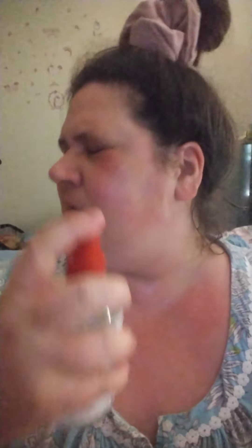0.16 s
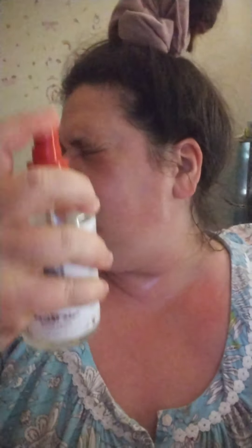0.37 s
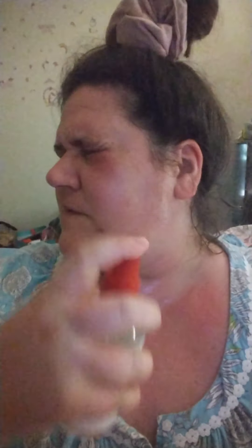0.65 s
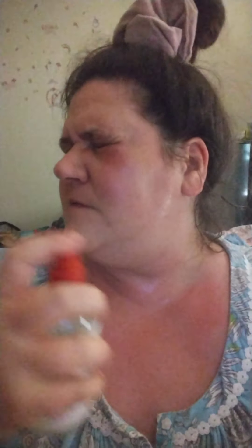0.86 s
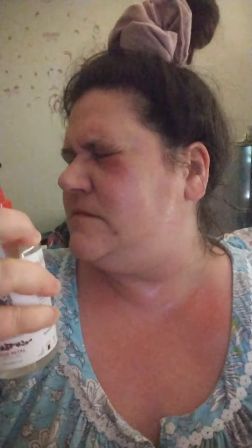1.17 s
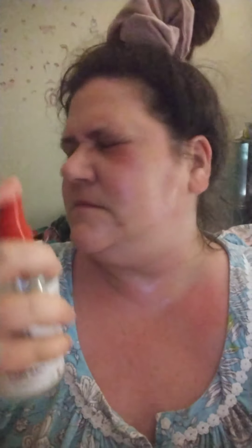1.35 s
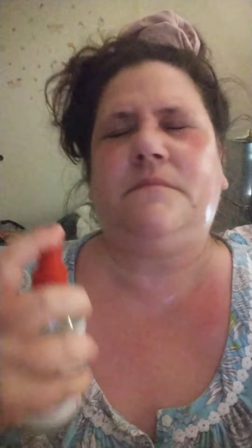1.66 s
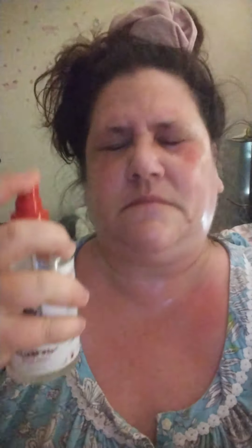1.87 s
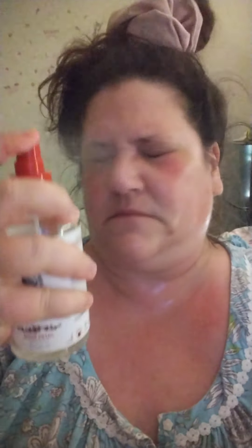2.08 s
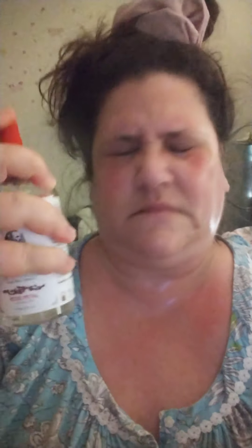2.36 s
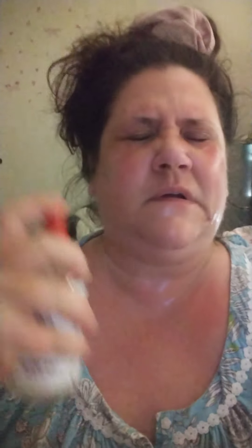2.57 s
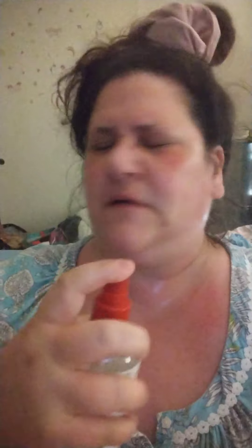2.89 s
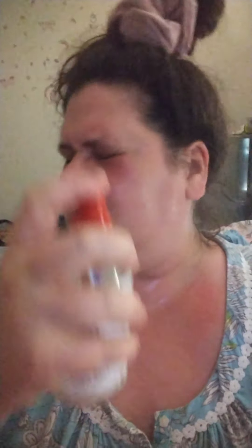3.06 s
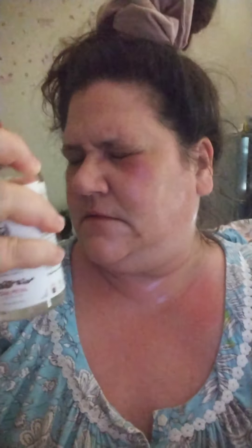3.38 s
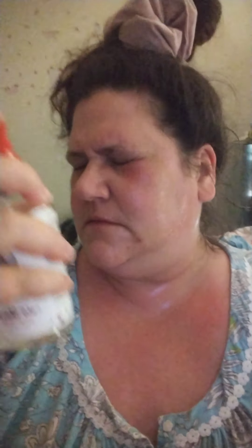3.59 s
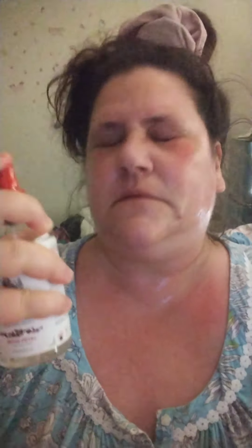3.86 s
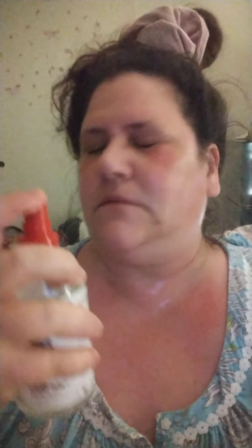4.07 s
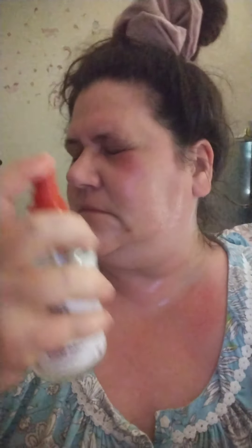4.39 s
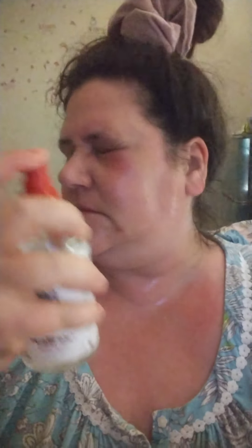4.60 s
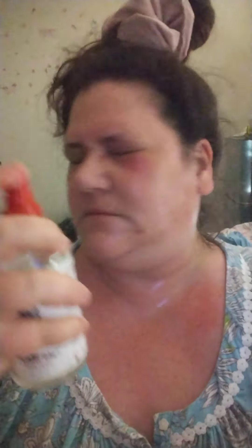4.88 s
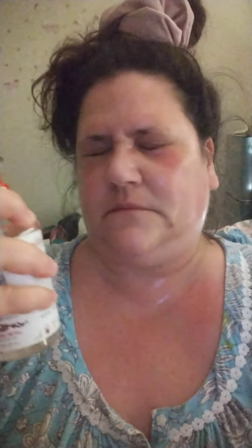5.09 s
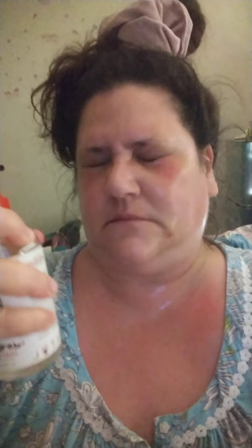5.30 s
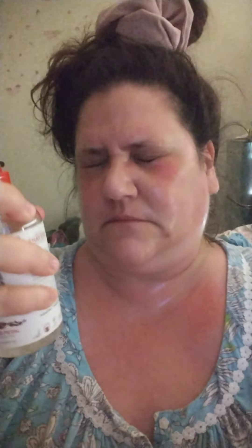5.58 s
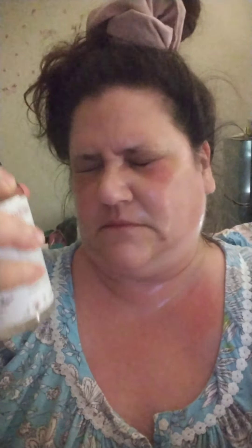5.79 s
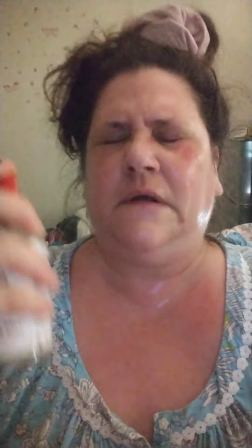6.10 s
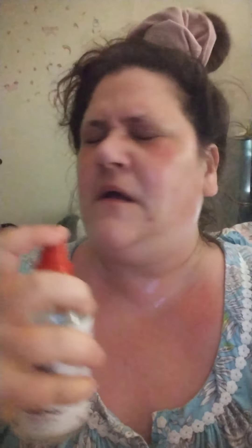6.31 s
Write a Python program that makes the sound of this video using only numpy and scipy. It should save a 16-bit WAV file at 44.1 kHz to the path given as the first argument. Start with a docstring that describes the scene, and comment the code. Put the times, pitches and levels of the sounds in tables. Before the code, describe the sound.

A small finger-pump spray bottle is pumped over and over, about three times a second, close to the microphone in a quiet furnished room. Each stroke starts with a light plastic click, gives a short bright hiss of mist and ends with a small knock as the plunger stops. Faint spring ticks and tiny liquid sounds follow. The pace stays steady while the sprays soften slightly.

```python
"""Finger-pump spray bottle, close up

A furnished room, a phone at arm's length, the bottle left of centre and pumped about three times a second.
Each stroke: the cap knocks and snaps free, the nozzle hisses until the plunger hits bottom, the cap
clacks back, the spring ticks as it lifts the plunger and liquid bubbles up the dip tube.
A low room tone and a faint hiss lie behind. The right microphone is shaded and misses the top treble."""
import sys
import numpy as np
from scipy import signal
from scipy.fft import rfft, irfft, next_fast_len
from scipy.io import wavfile

SR = 44100
rng = np.random.default_rng(int(sys.argv[2]) if len(sys.argv) > 2 else 0)


def file_out(sig):
    """Save sig as 16-bit WAV at sys.argv[1]."""
    # one column per channel
    cols = np.atleast_2d(sig).T
    # limit, then scale
    lim = np.clip(cols, -1, 1)
    pcm = np.round(lim * 32767).astype(np.int16)
    wavfile.write(sys.argv[1], SR, pcm)


N = 284445
TIME = np.arange(N) / SR
USUAL_PRESS_DB, USUAL_SPRAY_DB, USUAL_KNOCK_DB = -34, -35, -37  # an ordinary stroke
CAP_HZ = 5450  # a press retunes all modes by the stroke's cap tuning over this
RETURN_LAG_S_PER_S = 0.0016  # the finger lets the plunger up more slowly as the pumping goes on

# The pump strokes at arm's length, the first already under way at 0 s; levels are relative. Columns:
# cap free t/s, plunger stop t/s, press level/dB, cap tuning f/Hz, spray, stop knock, stop snap level/dB
STROKES = [(-0.1, 0.0193, -31, 5450, -32.5, -30.5, -23.5), (0.1794, 0.29, -29.5, 5580, -34, -33.5, -26.5),
           (0.4686, 0.5913, -29.5, 5500, -33, -31, -25), (0.7775, 0.8966, -33.5, 5670, -32, -31, -28),
           (1.0943, 1.2132, -30.5, 5370, -34.5, -35.5, -28), (1.391, 1.5094, -30, 5540, -33.5, -35.5, -43),
           (1.694, 1.8096, -30.5, 5320, -34, -33.5, -28), (1.9866, 2.103, -28, 5460, -33, -35.5, -29),
           (2.2866, 2.4148, -32, 5160, -35.5, -44, -56), (2.583, 2.7122, -32, 5340, -33.5, -41.5, -50),
           (2.879, 3.0027, -33.5, 4820, -34, -40.5, -30), (3.1836, 3.292, -35.5, 5170, -36, -36.5, -23.5),
           (3.4814, 3.5921, -36.5, 5350, -36, -34, -21.5), (3.775, 3.8926, -37, 5570, -37.5, -38, -25),
           (4.0827, 4.1913, -39, 5300, -35.5, -39, -25.5), (4.3912, 4.4972, -37.5, 5420, -35.5, -38, -22),
           (4.678, 4.786, -35.5, 5300, -35, -39.5, -24.5), (4.988, 5.0983, -37, 5370, -37.5, -41.5, -27),
           (5.2926, 5.396, -36, 5300, -35, -35.5, -26.5), (5.583, 5.6825, -38.5, 5390, -35.5, -34.5, -25.5),
           (5.854, 5.978, -39.5, 5540, -37.5, -48.5, -54), (6.1628, 6.269, -35.5, 5180, -37.5, -43, -36)]


def press_clicks(slack_s=.008, cap_boost_db=4):
    """The finger takes up the slack with a soft knock, then the cap snaps free; harder is brighter."""
    out = np.zeros((2, N))
    hz, _, drive, *_ = np.transpose(MODES)
    drive[np.argmin(abs(hz - CAP_HZ))] += cap_boost_db  # the snap favours the cap's own mode
    for s, _, press_db, cap_hz, *_ in STROKES[1:]:
        body_db = -39 + 0.69 * (press_db - USUAL_PRESS_DB)
        add(out, s - slack_s, plastic_click(padded(drive, 0.87), [body_db - 8.5], crack_db=-9.5))
        add(out, s, plastic_click(padded(drive, .15), [body_db, press_db, press_db - 3.5],
                                  crack_db=-3.5, tuning=cap_hz / CAP_HZ, detune=.01))
    return out


# Spectra of the jet at the nozzle and of its mist of droplets: f/Hz, relative level/dB
JET = [(150, -69), (330, -73.5), (520, -9), (1000, -5.5), (1600, 0), (2500, 1), (3500, 3.5), (4600, 1),
       (6000, 2), (8000, 4.5), (9500, -40), (12000, -46.5)]
MIST = [(6000, -44), (8500, -3.5), (10300, 2), (12000, 5.5), (13200, -2.5), (14500, 1.5), (16000, -20)]


def nozzle(open_s=0.034, rise_s=0.0008, close_lead_s=0.012, sag_db=1.5, leak_db=-19, jet_db=-8):
    """Pressure swells and sags through each stroke; the jet hisses and breaks into fine droplets."""
    spray = np.zeros((2, N))
    fall_s = np.array([[0.027], [0.026]])  # jet, mist
    for pressed, stop, _, _, spray_db, *_ in STROKES:
        start = pressed + open_s * undb(spray_db - USUAL_SPRAY_DB) ** -.37  # harder opens sooner
        opened = 1 - np.exp(-np.maximum(TIME - start, 0) / rise_s)
        closing = np.exp(-np.maximum(TIME - stop + close_lead_s, 0) / fall_s)
        travel = np.clip((TIME - start) / (stop - start), 0, 1)
        pressure = undb(sag_db * (1 / 3 - (2 * travel - 1) ** 2))
        seep = undb(leak_db) * (TIME > pressed) * (1 - opened)  # the valve seeps before it opens
        spray += undb(spray_db) * (opened * closing * pressure + seep)
    breakup = undb(.45 * wander(160) + 1.3 * wander(2500))
    jet = unit(colour(stereo_noise(N, 1300), JET))
    mist = unit(colour(stereo_noise(N, 720), MIST))
    return breakup * (spray[0] * undb(jet_db) * jet + spray[1] * mist)


def stop_knocks(thud_s=0.004115):
    """The plunger hits its stop: the bottle knocks, the contact snaps, and both ring the cap."""
    out = np.zeros((2, N))
    drive = np.array(MODES)[:, 3]
    for _, stop, *_, knock_db, snap_db in STROKES:
        ring_db = knock_db + 0.4 * (snap_db - knock_db)
        band_db = [knock_db - 1.1, ring_db - 6, snap_db - 2.5]
        add(out, stop, plastic_click(drive, band_db, crack_db=8, crack_s=0.00091))
        # the bottle jolts in the hand
        add(out, stop + thud_s, plastic_click(padded(drive), [knock_db - 6], crack_db=-35.5))
    return out


def rebounds(delay_s=.0113, bounce_s=.01, bounce_db=-14):
    """The cap clacks back and bounces once; a harder stop throws it further, so it is later and louder."""
    out = np.zeros((2, N))
    drive = padded(np.array(MODES)[:, 4], 0.26)
    for _, stop, *_, knock_db, _ in STROKES:
        force_db = knock_db - USUAL_KNOCK_DB
        s = stop + delay_s * undb(force_db) ** .37
        band_db = np.array([-39, -33.5, -37.5]) + force_db * np.array([0.81, 0.6, 0.92])
        add(out, s, plastic_click(drive, band_db, crack_db=2.5))
        add(out, s + bounce_s, plastic_click(drive, band_db + bounce_db))
    return out


# The two places where the rising spring catches, before lag and fade:
# t/s after the stop, bottle body level/dB, cap ring level/dB, coil f/Hz
SPRING_CATCHES = [(.067, -53, -53, 2090), (.106, -56.5, -49, 2820)]


def spring(body_fade_db_per_s=0.54, coil_boost_db=15):
    """A soft double tick at each catch rings the modes near the coil's pitch; later returns are gentler."""
    out = np.zeros((2, N))
    hz, *_, drive = np.transpose(MODES)
    for _, stop, *_ in STROKES:
        fade_db = body_fade_db_per_s * stop * np.array([1, 7, 7])  # gentler is also duller
        for delay_s, body_db, ring_db, coil_hz in SPRING_CATCHES:
            s = stop + delay_s + RETURN_LAG_S_PER_S * stop
            focused = drive + coil_boost_db * np.exp(-(np.log(hz / coil_hz) / 0.2) ** 2)
            band_db = np.array([body_db, ring_db, ring_db - 12]) - fade_db - 0.6 * rng.standard_normal()
            add(out, s - .001, plastic_click(focused, band_db - 1, crack_db=-16, crack_s=0.0024))
            add(out, s + rng.uniform(0.00083, 0.0034), plastic_click(focused, band_db + 3, crack_db=-23))
    return out


def refill(delay_s=.114, span_s=.03, bubbles=5, tube_hz=3130, glide=.04, t60_s=.02, size=1024):
    """Liquid is sucked up the dip tube after each stroke: small bubbles chirp and the ball valve ticks."""
    out = np.zeros((2, N))
    t = np.arange(size) / SR
    for _, stop, *_ in STROKES:
        s = stop + delay_s + RETURN_LAG_S_PER_S * stop
        valve_gain = undb(-46 - 2.2 * stop)  # the ticks fade as the returns grow gentler
        for when, pitch, strength in rng.uniform(0, 1, (bubbles, 3)):
            hz = tube_hz * (.95 + .1 * pitch) * (1 + glide * t / t[-1])
            bubble = np.sin(2 * np.pi * np.cumsum(hz) / SR) * undb(-49.5 - 60 * t / t60_s)
            tick = stereo_noise(size, 2000) * np.exp(-t / .0005)
            add(out, s + when * span_s, strength * (bubble + valve_gain * tick))
    return out


# Modes of bottle and cap: f/Hz, uncapped t60/s, drive level/dB for press, stop, rebound, spring return
MODES = [(437.5, 0.026, -13.5, -17, -10.5, -9.5), (811, 0.011, -5.5, 3, -3.5, -9),
         (1060, 0.012, -15.5, 1.5, -29, 5), (1406, 0.032, -21.5, -6.5, -13, 0.5),
         (1776, 0.017, -12.5, 2.5, 1, -27), (2090, 0.007, -45, 18, -2.5, 5.5),
         (2446, 0.023, 4.5, 10, 2.5, -2.5), (2635, 0.018, 2, -4, 10, -1), (3044, 0.028, -4, 4, -12.5, -5.5),
         (4150, 0.0066, 4.5, 8, 2.5, 1), (4980, 0.0051, -9.5, -17, 7.5, -15),
         (5360, 0.0078, 7.5, -12.5, 1, -14), (5727, 0.01, 11.5, 13, 11.5, 1.5),
         (6800, 0.012, 6, -27.5, 0, -13.5), (9890, 0.013, 0.5, 21, 11, 16.5),
         (10280, 0.0087, 8, 1, 11.5, 14.5), (12420, 0.011, 13.5, 15, 28.5, 7.5)]
# A click's body, ring and snap bands: lower f/Hz, upper f/Hz
CLICK_BANDS = [(340, 3400), (3400, 8500), (8500, 14500)]


def plastic_click(drive, band_db, crack_db=0, crack_s=0.0017, tuning=1, detune=0.043, size=2048):
    """A crack of contact and the damped modes it rings; band_db is each band's energy as 10 ms rms."""
    t = np.arange(size) / SR
    hz, t60 = np.transpose(MODES)[:2, :, None]
    t60 = np.minimum(t60, 36 / hz)  # 36 cycles at most: soft plastic stops the high modes soonest
    pitch, strength, phase, spread = rng.standard_normal((4, len(hz), 1))
    # short waves reach the two microphones with unrelated phases
    phase = 1.28 * phase + np.array([1, -1])[:, None, None] * spread * np.minimum((hz / 4000) ** 2, 1)
    envelopes = undb(drive[:, None] + 2.5 * strength - 60 * t / t60)
    ring_hz = hz * tuning * (1 + detune * pitch)
    click = np.sum(envelopes * np.sin(2 * np.pi * ring_hz * t + phase), axis=1)
    click += undb(crack_db + 2.5) * stereo_noise(size, 1400) * np.exp(-t / crack_s)
    click *= 1 - np.exp(-t / .0003)  # the contact yields for an instant
    out = 0
    for edges, db in zip(CLICK_BANDS, band_db):
        band = signal.sosfilt(signal.butter(3, edges, "bandpass", fs=SR, output="sos"), click)
        out = out + undb(db) * unit(band) * np.sqrt(.01 * SR / size)
    return out


def padded(drive, softness=1):
    """A padded push hardly drives the high modes."""
    return drive - softness * 20 * np.log10(1 + (np.array(MODES)[:, 0] / 1000) ** 2)


# Colour of the reflections from the furnished room: f/Hz, relative level/dB
WALLS = [(150, 13), (500, 3), (1300, 3), (2400, 0.5), (3600, 1), (5300, -3.5), (6800, 3.5), (10000, -4),
         (16000, -9.5)]


def room(direct, t60_s=0.24, first_s=0.00061, build_s=0.00053, send_db=-7, size=24000):
    """Dense reflections from close walls and bedding build up at once and die quickly."""
    t = np.arange(size) / SR
    low = signal.sosfilt(signal.butter(2, 3500, fs=SR, output="sos"), stereo_noise(size, 932))
    high = signal.sosfilt(signal.butter(2, 3500, "highpass", fs=SR, output="sos"), stereo_noise(size, 740))
    tail = (low + high) * undb(-60 * t / t60_s)
    tail *= 1 - np.exp(-np.maximum(t - first_s, 0) / build_s)
    tail = colour(unit(tail) / np.sqrt(size), WALLS)
    return undb(send_db) * signal.fftconvolve(direct, tail, axes=1)[:, :N]


# Room tone at the phone: f/Hz, relative level/dB
ROOM_TONE = [(25, -1.5), (50, -1), (105, 4.5), (160, -1.5), (300, -3.5), (700, -17), (2000, -19),
             (6000, -59), (16000, -42)]
# A faint hiss that hangs between the early strokes: t/s, level/dB
FAINT_HISS = [(0, -54.5), (1.3, -53.5), (2.85, -57), (3.1, -73.5), (6.45, -70.5)]


def background(tone_db=-68, swell_db=2):
    """A low, wavering room tone and a faint, flickering hiss that drops away near 3 s."""
    tone = undb(tone_db + swell_db * wander(14)) * unit(colour(stereo_noise(N, 900), ROOM_TONE))
    hiss_spectrum = [(300, -12.5), (2500, -4.5), (7000, -13.5), (11000, -6), (16000, -23.5)]
    hiss = unit(colour(stereo_noise(N, 580), hiss_spectrum))
    hiss_db = np.interp(TIME, *np.transpose(FAINT_HISS)) + 2 * wander(85)
    return tone + hiss * undb(hiss_db)


def stereo_noise(size, split_hz):
    """Noise at the two microphones: alike in the bass, unrelated above the split."""
    mid, side = rng.standard_normal((2, size))
    alike = 1 / (1 + (np.fft.rfftfreq(size, 1 / SR) / split_hz) ** 2)
    mid, side = rfft(mid) * np.sqrt(1 + alike), rfft(side) * np.sqrt(1 - alike)
    return unit(irfft(np.array([mid + side, mid - side]), size))


def colour(x, spectrum):
    """Filter by a spectrum of (f/Hz, level/dB) points."""
    hz, db = np.transpose(spectrum)
    size = next_fast_len(x.shape[-1] + 2048)
    f = np.maximum(np.fft.rfftfreq(size, 1 / SR), 1)
    gain = undb(np.interp(np.log(f), np.log(hz), db))
    return irfft(rfft(x, size) * gain, size)[..., :x.shape[-1]]


def wander(rate_hz):
    """Smooth random drift with rms 1."""
    knots = np.arange(0, TIME[-1] + 1, 1 / rate_hz)
    return unit(np.interp(TIME, knots, rng.standard_normal(len(knots))))


def add(out, s, sound):
    """Mix a sound in at s seconds."""
    i = max(int(s * SR), 0)
    part = sound[:, :max(N - i, 0)]
    out[:, i:i + part.shape[1]] += part


def undb(db):
    """Decibels to gain."""
    return 10 ** (np.asarray(db) / 20)


def unit(x):
    """Scale to rms 1."""
    return x / np.sqrt(np.mean(x ** 2))


def scene(lag_samples=6):
    """The bottle is held left of centre, so its sound reaches the right microphone later."""
    left, right = press_clicks() + nozzle() + stop_knocks() + rebounds() + spring() + refill()
    direct = np.array([left, np.pad(right, (lag_samples, 0))[:N]])
    return direct + room(direct) + background()


# The phone's shaded right microphone against its left: f/Hz, level/dB
RIGHT_MIC = [(100, -2.5), (450, -2.5), (750, -5), (1100, -2.5), (2500, -2.5), (4000, -2), (5500, 1.5),
             (7200, 2), (9000, -3), (10500, -14), (12500, -20), (16000, -16)]


def record(dry, top_hz=16000):
    """The shaded right microphone dulls the treble; the phone cuts the top."""
    heard = np.array([dry[0], colour(dry[1], RIGHT_MIC)])
    return signal.sosfilt(signal.ellip(8, .2, 70, top_hz, fs=SR, output="sos"), heard)


dry = scene()
out = record(dry)
file_out(out)
```